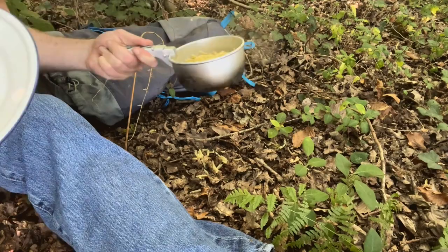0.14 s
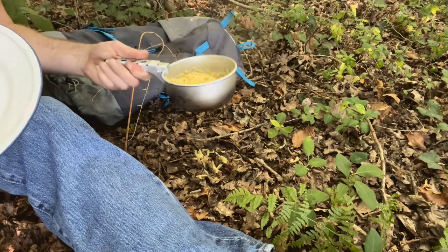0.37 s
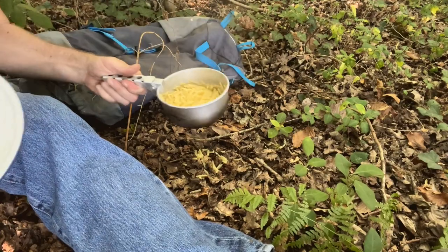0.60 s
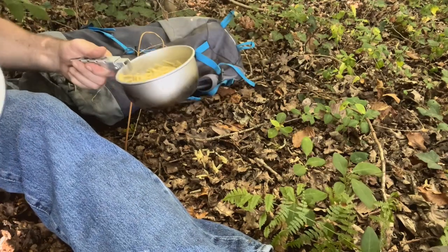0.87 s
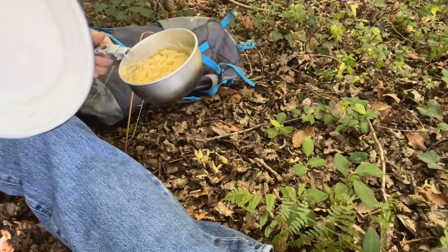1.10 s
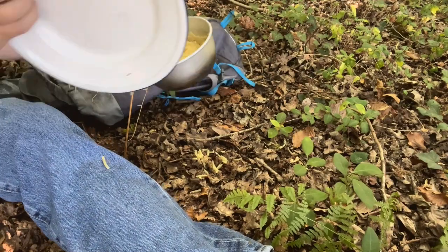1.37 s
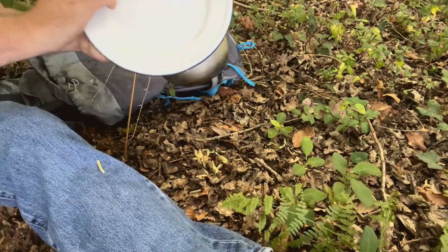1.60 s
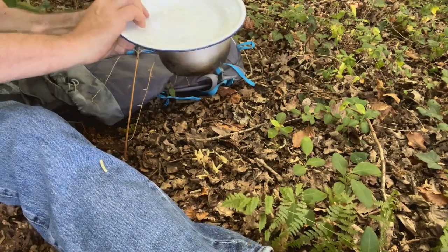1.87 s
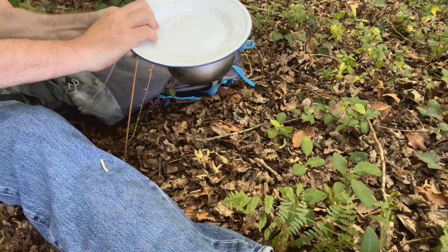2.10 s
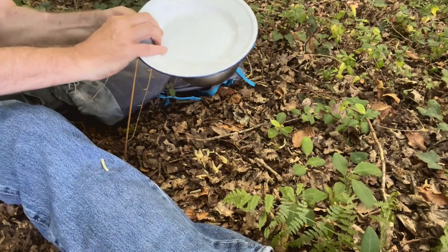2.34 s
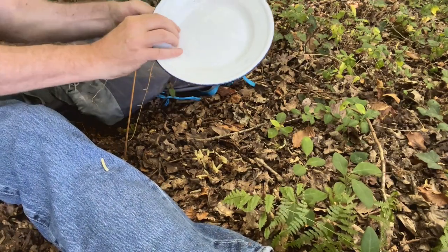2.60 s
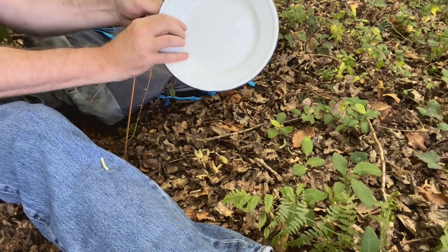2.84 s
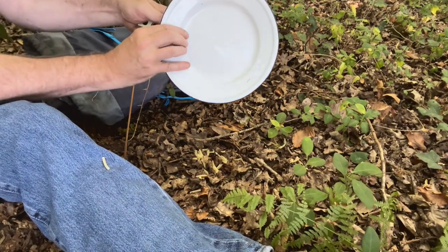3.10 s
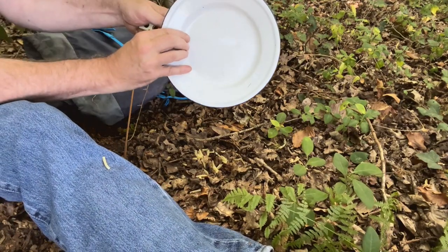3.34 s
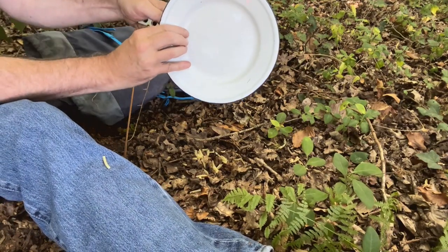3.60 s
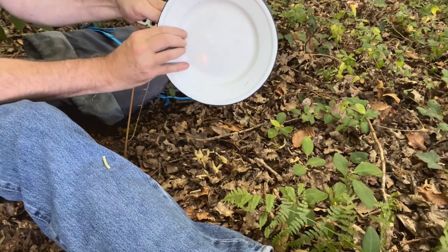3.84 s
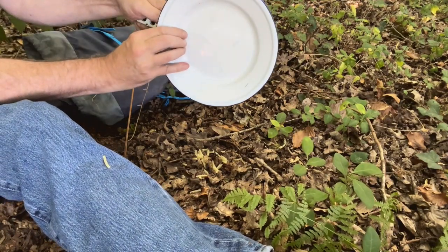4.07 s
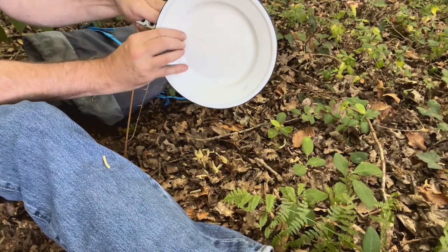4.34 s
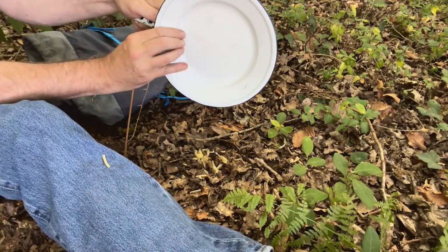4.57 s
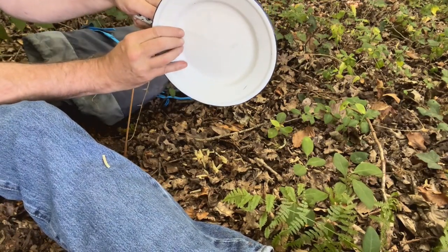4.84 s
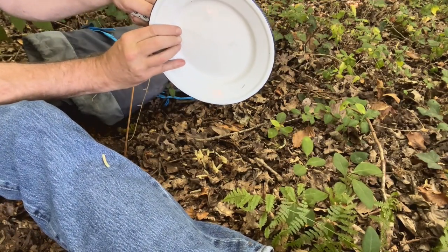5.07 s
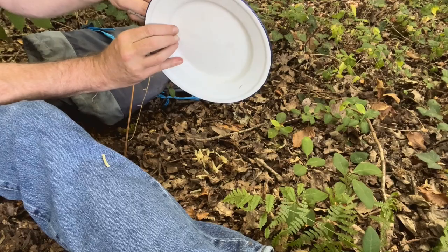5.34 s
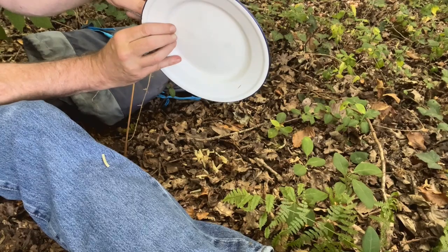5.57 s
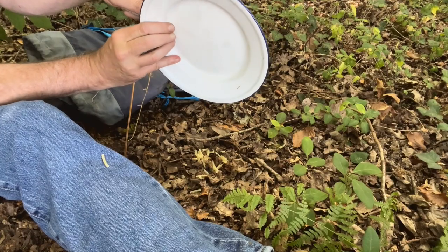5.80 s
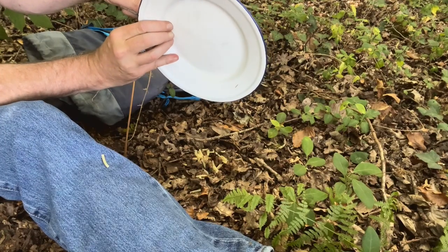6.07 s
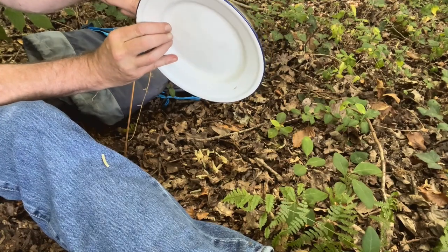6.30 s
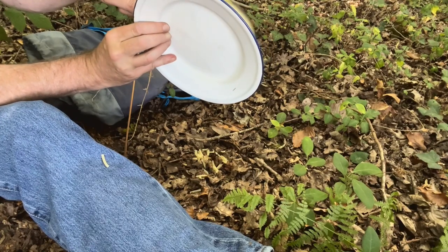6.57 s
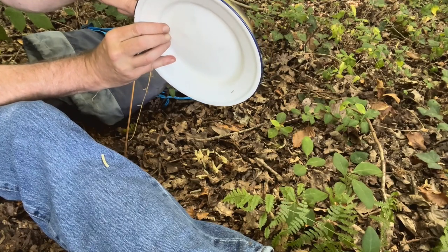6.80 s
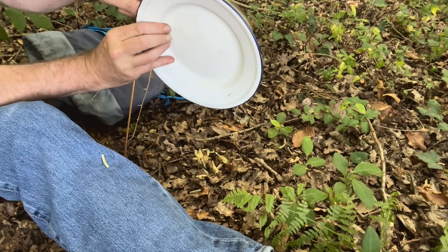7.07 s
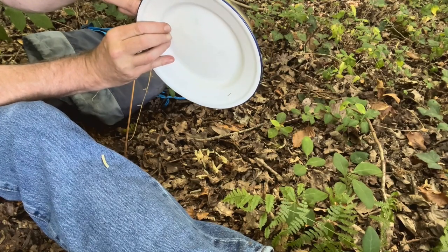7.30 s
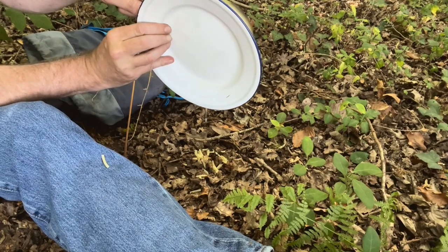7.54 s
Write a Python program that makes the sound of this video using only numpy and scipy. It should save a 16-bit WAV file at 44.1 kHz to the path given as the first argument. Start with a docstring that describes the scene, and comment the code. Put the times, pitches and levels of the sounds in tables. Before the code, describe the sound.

Close stereo microphone in a wood. Dry leaves and cloth rustle and tick, and a pot handle jingles faintly. An enamel plate then lands on a small metal pot with a loud hollow bonk and bright short ring, followed by a quick clatter. Later come a softer scrape and knock, pattering leaf ticks, and a final sharp, damped clank. Distant road noise underlies everything.

```python
"""A wood: far road noise with an engine hum fills it, as coloured noise and a wavering sine.
Dry leaves and cloth tick and rustle nearby: noise bursts and clumps of small resonant snaps.
A small pot's folding handle jingles once: thin modes driven by noise.
An enamel plate is laid on the metal pot, scrapes, slides and knocks against its rim;
the air shut in the pot thuds, the plate rings in modes set by the place struck."""
import sys
import numpy as np
from scipy import signal
from scipy.fft import rfft, irfft
from scipy.io import wavfile

SR = 44100
rng = np.random.default_rng(int(sys.argv[2]) if len(sys.argv) > 2 else 0)


def decibels_to_gain(level_db):
    """Convert a level in decibels to a linear amplitude gain (20 dB per decade)."""
    exponent = np.asarray(level_db, float) / 20
    return 10 ** exponent


def to_wav(s):
    """Save 16-bit WAV."""
    ch = np.atleast_2d(s).T  # columns
    pcm = np.round(np.clip(ch, -1, 1) * 32767)  # PCM
    wavfile.write(sys.argv[1], SR, pcm.astype(np.int16))


N = 338407

# plate modes: (frequency [Hz], waves around the rim, phase of that pattern [degrees])
PLATE_MODES = [(875, 13, 110), (1030, 11, 115), (1262, 4, 60), (1281, 5, 130), (1430, 2, 150),
               (1793, 9, 100), (1903, 8, 30), (2095, 4, 50), (2260, 9, 120), (2312, 2, 150),
               (2410, 12, 150), (2686, 15, 85), (2778, 8, 10), (2880, 13, 85), (3035, 4, 155),
               (3300, 11, 70), (3510, 11, 25), (3540, 10, 15), (3740, 2, 130), (4075, 2, 130),
               (4275, 12, 90), (4390, 3, 135), (4625, 10, 35), (5110, 3, 145), (5420, 12, 15),
               (5864, 15, 85), (6080, 9, 170), (4511, 14, 75), (6370, 12, 175), (7784, 12, 135)]
# sound of each of those modes: (level [dB], t60 [s])
PLATE_MODE_RING = [(-2.5, 0.26), (-6.0, 0.15), (-5.0, 0.35), (-2.5, 0.3), (3.0, 0.37), (-1.0, 0.3),
                   (6.5, 0.15), (-4.0, 0.17), (-0.5, 0.26), (-4.5, 0.3), (2.0, 0.14), (-6.5, 0.377),
                   (-5.5, 0.37), (2.0, 0.08), (1.5, 0.1), (-3.5, 0.16), (-4.5, 0.3), (-5.0, 0.3),
                   (-6.5, 0.16), (-4.5, 0.07), (-9.0, 0.3), (-7.5, 0.17), (-10.5, 0.25), (-14.0, 0.3),
                   (-0.5, 0.046), (-6.0, 0.08), (-6.0, 0.1156), (-6.5, 0.07), (-10.0, 0.079), (-13.5, 0.1)]


def rms_one(x):
    """Scale to unit rms."""
    return x / np.sqrt(np.mean(x ** 2) + 1e-20)


def in_time(rows):
    """Interpolate each column after the first over the whole scene."""
    s, *columns = np.transpose(rows)
    return [np.interp(np.arange(N) / SR, s, c) for c in columns]


def at_hz(points, hz):
    """Interpolate (Hz, dB) points on a log frequency axis."""
    point_hz, point_db = np.array(points).T
    return np.interp(np.log(hz + 1), np.log(point_hz), point_db)


def coloured(x, points):
    """Zero-phase colouring of steady noise."""
    n = x.shape[-1]
    gain = decibels_to_gain(at_hz(points, np.fft.rfftfreq(n, 1 / SR)))
    return irfft(rfft(x) * gain, n)


def resonance(x, hz, width_hz):
    """Two-pole resonator with zeros at DC and Nyquist."""
    r = np.exp(-np.pi * width_hz / SR)
    zeros = [(1 - r * r) / 2, 0, (r * r - 1) / 2]
    poles = [1, -2 * r * np.cos(2 * np.pi * hz / SR), r * r]
    return signal.lfilter(zeros, poles, x)


def narrow_band(x, hz, width_hz):
    """Unit-rms noise band from two equal resonators in series."""
    return rms_one(resonance(resonance(x, hz, width_hz), hz, width_hz))


def dying(t, hz, t60):
    """Exponentially decaying sine."""
    return np.sin(2 * np.pi * hz * t) * decibels_to_gain(-60 * t / t60)


def swell(top_s, rise_db_per_s, fall_db_per_s):
    """Gain that climbs to 1 at a moment and sinks after it."""
    t = np.arange(N) / SR - top_s
    return decibels_to_gain(np.where(t < 0, rise_db_per_s * t, -fall_db_per_s * t))


def add(out, s, sound):
    """Mix a sound in at a time in seconds, cut at the end."""
    i = round(s * SR)
    out[..., i:i + sound.shape[-1]] += sound[..., :N - i]


def wide(mid, side):
    """Left and right from a middle and a weaker, unrelated side."""
    # background: (frequency [Hz], side minus mid [dB])
    side_colour = [(35, -45.5), (60, -23.5), (110, -14), (200, -13), (380, -11), (700, -10.5), (1290, -10),
                   (2380, -12), (4400, -14), (8120, -10), (15000, -15.5)]
    return mid + coloured(side, side_colour) * [[1], [-1]]


def road():
    """Tyre roar and rumble swell apart; an engine hum wavers; thin hiss bands lie on top."""
    # spectrum: (frequency [Hz], relative density [dB per Hz])
    road_colour = [(13, -42.5), (22, 10.5), (72, 4), (189, -10.5), (409, -13.5), (1070, -6.5),
                   (1380, -12.5), (3060, -26), (4500, -26.5), (5770, -26), (7190, -29), (8490, -31),
                   (11500, -28), (14700, -32.5), (16000, -38)]
    # (time [s], tyre roar level [dB], rumble level [dB])
    road_levels = [(0, -57.5, -62.5), (2.0, -56, -60), (3.3, -57.5, -59.5), (5.7, -57, -62),
                   (6.3, -57.5, -59.5), (7.1, -57, -59.5), (7.67, -57, -66.5)]
    # engine: (time [s], frequency [Hz], level [dB])
    engine_hum = [(0, 91.3, -90), (2.3, 91.9, -66), (3.2, 92.3, -61), (4.8, 91.2, -62), (5.6, 92.7, -68.5),
                  (7.67, 90, -80.5)]
    # thin steady hiss: (centre [Hz], width of each resonator [Hz], level [dB])
    hiss_bands = [(5600, 240, -81), (11460, 1300, -78), (10000, 1067, -78)]
    roar_db, rumble_db = in_time(road_levels)
    noise = wide(*coloured(rng.standard_normal((2, N)), road_colour))
    rumble = signal.sosfiltfilt(signal.butter(2, 130, fs=SR, output="sos"), noise)
    roar = noise - rumble

    hum_hz, hum_db = in_time(engine_hum)
    waver = 1 + 0.12 * rms_one(resonance(rng.standard_normal(N), 1.1, 2.1))
    hum = decibels_to_gain(hum_db) * np.sqrt(2) * waver * np.sin(2 * np.pi * np.cumsum(hum_hz) / SR)

    hiss = wide(*rng.standard_normal((2, N)))
    whine = sum(decibels_to_gain(db) * narrow_band(hiss, hz, width_hz) for hz, width_hz, db in hiss_bands)
    return decibels_to_gain(roar_db) * rms_one(roar) + decibels_to_gain(rumble_db) * rms_one(rumble) + hum + whine


def rustle():
    """Clumps of small snaps, each with its own short resonance, over friction noise; brightness tilts the mix."""
    # steady stirring of leaves and cloth: (time [s], level [dB], brightness [dB])
    stirring = [(0, -69.5, -11), (.4, -95, -26), (.65, -62, -1), (.98, -69, -7), (1.1, -59, -4),
                (1.45, -56, -1.5), (1.7, -91, -8.5), (1.76, -63, 0), (2.3, -83.5, -21), (2.8, -63.5, 3.5),
                (3.3, -69.5, -4), (4.3, -81, -3), (4.45, -69.5, -7.5), (5.1, -71.5, 2), (5.68, -68.5, -2),
                (5.78, -79, 2.5), (6.4, -87, 8), (6.6, -95, 0.5)]
    # single swishes: (loudest time [s], level [dB], brightness [dB], length [s])
    swishes = [(0.1, -51.5, 2.5, 0.075), (0.192, -52, 2, 0.074), (0.344, -55.5, -1, 0.087),
               (0.845, -53.5, 0.5, 0.12), (1.525, -47, 0, 0.14), (1.67, -51, -0.5, 0.076),
               (2.903, -59, 1, 0.18), (3.411, -54.5, 0, 0.07), (4.033, -63, 2, 0.14), (4.46, -66, 10, 0.21),
               (5.575, -69, 5, 0.12), (6.432, -67, 3, 0.073)]
    # spectrum: (frequency [Hz], relative density [dB per Hz])
    rustle_colour = [(880, -28.5), (1500, -6.5), (1790, -7), (3150, -9.5), (3450, -7), (11100, -10.5),
                     (14800, -15), (16000, -37.5)]
    grains_per_s, spread_db, smooth_gain, clump_db = 890, 6, 2.86, 5   # grain rate is also scaled by the clumps
    rise_share, range_db = 0.5, 9   # share of a swish spent rising; fall from top to either end

    level_db, tilt_db = in_time(stirring)
    low_power, high_power = decibels_to_gain(level_db - tilt_db) ** 2, decibels_to_gain(level_db + tilt_db) ** 2
    for s, db, bright_db, length_s in swishes:
        rise_db_per_s = range_db / (rise_share * length_s)
        fall_db_per_s = range_db / ((1 - rise_share) * length_s)
        power = swell(s, rise_db_per_s, fall_db_per_s) ** 2
        low_power = low_power + power * decibels_to_gain(db - bright_db) ** 2
        high_power = high_power + power * decibels_to_gain(db + bright_db) ** 2

    clumps = decibels_to_gain(clump_db * rms_one(resonance(rng.standard_normal(N), 15.0, 36)))
    born = rng.random((2, N)) < clumps * grains_per_s / SR
    sizes = born * decibels_to_gain(spread_db * np.minimum(rng.exponential(1, (2, N)), 4))
    sizes = sizes * rng.choice([-1, 1], (2, N))
    dealt = rng.integers(0, 8, (2, N))   # which of eight resonances a grain excites
    snaps = sum(rms_one(resonance(sizes * (dealt == k) + 1e-18, hz, 0.3 * hz)) * np.sqrt(hz)
                for k, hz in enumerate(np.geomspace(2500, 13000, 8)))
    friction = smooth_gain * np.sqrt(clumps) * rng.standard_normal((2, N))
    mid, side = coloured(rms_one(snaps) + friction, rustle_colour)
    both = rms_one(wide(mid, side))
    low = signal.sosfiltfilt(signal.butter(1, 6000, fs=SR, output="sos"), both)
    return np.sqrt(low_power) * low + np.sqrt(high_power) * (both - low)


def faint_ticks():
    """Rows like those of the loud ticks, at chance times, levels and pitches."""
    # spells; the dense one is water draining on dry leaves: (start [s], end [s], rate [ticks per s])
    spells = [(0, 1.7, 18), (2.2, 4.35, 6), (4.37, 5.7, 45), (5.7, 6.5, 4)]
    mean_db, spread_db, t60_s, low_hz, high_hz = -45.5, 4, 0.0064, 3910, 13300
    rows = []
    for start, end, rate in spells:
        for a, b, c in rng.random((int(rate * (end - start)), 3)):
            s = start + (end - start) * a
            db = mean_db + spread_db * (2 * b - 1)
            rows.append((s, db, low_hz * (high_hz / low_hz) ** c, t60_s))
    return rows


def ticks():
    """Each snap is an impulse and a noise burst with a broad resonance of its own; low bursts are made alike."""
    # loud leaf and cloth ticks: (time [s], peak of the middle before panning [dB], centre [Hz], t60 [s])
    loud_ticks = [(0.0452, -42, 3840, 0.004), (0.1503, -25, 9300, 0.0095), (0.192, -34.5, 8700, 0.0075),
                  (0.294, -27, 4860, 0.043), (0.373, -42.5, 3650, 0.0078), (0.4814, -40, 2750, 0.013),
                  (0.4897, -42, 2650, 0.014), (0.5459, -32, 5600, 0.028), (0.5527, -35.5, 5600, 0.012),
                  (0.6106, -41, 3280, 0.0079), (0.8189, -44, 4300, 0.012), (0.9571, -42, 7400, 0.011),
                  (1.1455, -43.5, 2830, 0.018), (1.5267, -29.5, 7000, 0.018), (1.689, -39.5, 5400, 0.01),
                  (1.895, -39.5, 7000, 0.0073), (2.078, -38, 12400, 0.036), (2.237, -36, 9550, 0.0048),
                  (2.6314, -39, 5800, 0.0097), (2.6643, -31, 5900, 0.011), (2.834, -35.5, 4320, 0.0041),
                  (2.9037, -31, 10000, 0.0061), (2.919, -37, 5970, 0.0067), (3.4102, -41, 4660, 0.011),
                  (3.7716, -33.5, 5330, 0.008), (3.778, -37.5, 10000, 0.015), (4.368, -21.5, 9900, 0.0057),
                  (4.6039, -38.5, 7200, 0.0081), (4.897, -36.5, 5160, 0.0081), (4.971, -34.5, 10900, 0.01),
                  (5.1017, -38.5, 10100, 0.017), (5.2646, -36, 9750, 0.019), (5.3343, -41, 8200, 0.0082),
                  (5.5239, -37.5, 4660, 0.014), (5.655, -22, 11160, 0.0088), (5.8933, -39, 10000, 0.0083),
                  (6.314, -36, 10100, 0.015), (6.4112, -40, 9700, 0.0083), (6.956, -35.5, 5260, 0.0095)]
    # low bursts: dull thumps, and the low body of some ticks and of the knock at 6.85 s:
    # (time [s], peak [dB], centre [Hz], t60 [s])
    low_bursts = [(1.253, -41, 600, .03), (1.256, -44, 1200, .02), (3.79, -45, 170, .1),
                  (5.295, -51, 200, .06), (6.8535, -19.5, 460, .014), (.2938, -37, 1000, .02),
                  (.5535, -42, 1000, .012)]
    snap = 3.87   # first impulse of a tick against the noise that follows
    width_share, broad_db, side_db = 0.14, -0.5, -18.5
    mean_pan_db, pan_spread_db = 2, 6.5   # left minus right
    out, t = np.zeros((2, N)), np.arange(SR // 8) / SR
    for s, db, hz, t60 in loud_ticks + faint_ticks():
        burst = rng.standard_normal((2, len(t))) * decibels_to_gain(-60 * t / max(t60, .002))
        burst[:, 0] = snap
        band = signal.butter(2, [0.13 * hz, min(3.0 * hz, .4 * SR)], "band", fs=SR, output="sos")
        narrow = rms_one(resonance(burst, hz, width_share * hz))
        broad = rms_one(signal.sosfilt(band, resonance(burst, hz, 1.7 * hz)))
        mid, side = narrow + decibels_to_gain(broad_db) * broad
        pan_db = rng.normal(mean_pan_db, pan_spread_db) * np.array([[.5], [-.5]])
        stereo = mid + decibels_to_gain(side_db) * side * [[1], [-1]]
        add(out, s, decibels_to_gain(db + pan_db) * stereo / np.abs(mid).max())
    for s, db, hz, t60 in low_bursts:
        push = rng.standard_normal(len(t)) * decibels_to_gain(-60 * t / t60)
        push[0] = 2 * snap
        band = signal.butter(3, [.65 * hz, 1.8 * hz], "band", fs=SR, output="sos")
        low = signal.sosfilt(band, resonance(push, hz, .9 * hz))
        add(out, s, decibels_to_gain(db) * low / np.abs(low).max())
    return out


def jingle():
    """The loose handle rattles in its hinge: thin modes, roughened, over a hiss of tiny taps."""
    # rattles: (time [s], peak of the ringing modes [dB])
    rattles = [(0.508, -33.5), (0.5216, -37)]
    # handle modes: (frequency [Hz], relative level [dB], t60 [s])
    handle_modes = [(2082, 2, 0.075), (5300, -3, 0.04), (5800, -1.5, 0.05), (6160, 2, 0.19),
                    (7080, 4, 0.045), (7900, 4, 0.18), (8400, -1.5, 0.05), (9250, -1.5, 0.05),
                    (10650, -3, 0.06), (11600, -6, 0.04)]
    hiss_db, hiss_t60_s, taps_t60_s = -5, .09, .045
    out, t = np.zeros(N), np.arange(SR // 3) / SR
    for s, db in rattles:
        taps = rng.standard_normal(len(t)) * decibels_to_gain(-60 * t / taps_t60_s)
        ring = sum(decibels_to_gain(mode_db) * rms_one(resonance(taps, hz, 2.2 / t60))
                   for hz, mode_db, t60 in handle_modes)
        hiss = resonance(rng.standard_normal(len(t)), 4300, 4200) * decibels_to_gain(hiss_db - 60 * t / hiss_t60_s)
        add(out, s, decibels_to_gain(db) * (ring / np.abs(ring).max() + hiss))
    return out


def scrape():
    """Friction noise in a few narrow bands: a faint scrape while the plate is brought over."""
    # (time [s], level [dB])
    scrape_levels = [(.98, -87), (1.06, -63.5), (1.3, -64), (1.52, -67), (1.6, -90)]
    # (centre [Hz], width of each resonator [Hz], relative level [dB])
    scrape_bands = [(1540, 162, 2.5), (2733, 240, -0.5), (3180, 220, -3.5)]
    noise = rng.standard_normal(N)
    bands = sum(decibels_to_gain(db) * narrow_band(noise, hz, width_hz) for hz, width_hz, db in scrape_bands)
    return decibels_to_gain(in_time(scrape_levels)[0]) * bands


def slides():
    """Small uneven catches of enamel on the rim drive air and hand-damped plate; each slide swells, then stops."""
    # plate sliding on the rim: (start [s], loudest time [s], shut-in air level [dB], plate level [dB])
    slide_rows = [(2.51, 2.582, -63, -55), (2.619, 2.659, -43, -52), (2.945, 3.007, -47, -50.5),
                  (6.795, 6.862, -42, -48), (6.875, 6.984, -56.5, -59.5), (7.626, 7.679, -51, -54.5)]
    catches_per_s, rise_db, fall_db_per_s = 1500, 20, 504
    air_hz, air_width_hz, plate_width_hz = 620, 75, 44
    shapes = np.array([swell(top_s, rise_db / max(top_s - s, .01), fall_db_per_s) * (np.arange(N) > s * SR)
                       for s, top_s, *levels in slide_rows])
    air_db, plate_db = np.transpose(slide_rows)[2:]
    catches = (rng.random(N) < catches_per_s / SR) * rng.standard_normal(N)
    air = rms_one(resonance(catches, air_hz, air_width_hz))
    plate = rms_one(sum(decibels_to_gain(db / 2) * resonance(resonance(catches, hz, 400), hz, plate_width_hz)
                        for (hz, waves, phase), (db, t60) in zip(PLATE_MODES, PLATE_MODE_RING)))
    return decibels_to_gain(air_db) @ shapes * air + decibels_to_gain(plate_db) @ shapes * plate


def pot_thud(t, thud_db, air_hz, body_db, t60):
    """Air, beating pot body, walls and rim, each dying in its share of the air's t60, the dull walls soonest."""
    # dull wall modes: (frequency [Hz], level against the air [dB], share of the thud's t60)
    wall_modes = [(194.8, -20, 0.39), (416, -9.5, 0.21)]
    rim_db = 2.5 + .75 * thud_db   # stronger blows stir the rim more
    thud = dying(t, air_hz, t60) - decibels_to_gain(body_db) * dying(t, 592, 0.72 * t60)
    thud += sum(decibels_to_gain(db) * dying(t, hz, share * t60) for hz, db, share in wall_modes)
    thud -= decibels_to_gain(rim_db) * dying(t, 2420, .92 * t60)
    return thud * (1 - np.exp(-t / 0.0013))   # the contact lasts a cycle or two


def plate_strength(place):
    """Mode amplitudes by place on the rim [degrees]; a blow near a node hardly stirs that mode."""
    hz, waves, phase = np.transpose(PLATE_MODES)[:, :, None]
    level_db = np.transpose(PLATE_MODE_RING)[0][:, None]
    shape = np.cos(np.radians(waves * place - phase))
    return decibels_to_gain(level_db) * np.sign(shape) * np.hypot(.08, shape)


def plate_ring(t, strength, grip_db_per_s):
    """Decaying plate modes; the hand damps high modes more."""
    hz = np.transpose(PLATE_MODES)[0][:, None]
    t60 = np.transpose(PLATE_MODE_RING)[1][:, None]
    hand = decibels_to_gain(-max(grip_db_per_s, 0) * (hz / 2000) ** .7 * t)
    return (strength * dying(t, hz, t60) * hand).sum(axis=0)


def rim_crack(t, strength):
    """Short coloured noise burst, and the plate modes it shakes as a dying clatter."""
    # spectrum: (frequency [Hz], relative density [dB per Hz])
    crack_colour = [(150, -57.5), (700, -6), (1300, -11), (3000, -10.5), (6000, -17.5), (8000, -27.5),
                    (11500, -20.5), (16000, -29.5)]
    crack_db, crack_t60_s, clatter_db, clatter_t60_s, clatter_width_hz = -8, 0.036, -20.5, 0.048, 15
    noise = rms_one(coloured(rng.standard_normal(len(t)), crack_colour))
    gains = np.sqrt(np.abs(strength[:, 0]))
    chatter = rms_one(sum(gain * resonance(noise, hz, clatter_width_hz)
                          for (hz, waves, phase), gain in zip(PLATE_MODES, gains)))
    crack = noise * decibels_to_gain(crack_db - 60 * t / crack_t60_s)
    return crack + chatter * decibels_to_gain(clatter_db - 60 * t / clatter_t60_s)


def knocks():
    """Plate on rim: pot thud, plate modes weighted by where the rim is met, a click, a crack and a dying clatter."""
    # (time [s], thud level [dB], shut-in air [Hz], pot body against air [dB], ring level [dB],
    #  place on the plate's rim [degrees])
    knock_rows = [(1.787, -6, 712, -11, -30.5, 13), (1.9563, -17, 684, 1, -33.5, 39.5),
                  (1.9711, -11, 730, -2, -40, 39.5), (1.9765, -26, 700, 0, -27.5, 22.5),
                  (1.9855, -20.5, 725, 7.5, -42, 22.5), (2.1147, -27.5, 737, 2.5, -48, 107),
                  (2.1622, -31.5, 688, 0, -48.5, 104), (2.9972, -18.5, 703, 1.5, -35.5, 81.5),
                  (5.404, -36, 725, -23, -48, 111.5), (6.8535, -15.5, 730, -5, -25.5, 42),
                  (6.8563, -23, 715, 7, -44, 42), (2.029, -39, 710, 11, -55, 22.5),
                  (2.533, -46.5, 706, -3, -62, 22.5), (2.615, -39.5, 695, 2, -63, 104),
                  (2.651, -44, 700, 7, -56, 13), (2.657, -42, 680, 4, -65, 107),
                  (2.685, -46, 670, 9, -70, 104), (3.7712, -33, 900, -18, -56, 107),
                  (5.2944, -38, 710, -10, -50, 81.5)]
    # the hand closes on plate and pot: (time [s], plate damping at 2 kHz [dB per s], below 0 = none,
    #  thud t60 [s])
    hand_grip = [(1.79, -10, 0.083), (1.96, 71, 0.051), (1.99, 67, 0.034), (2.16, 184.5, 0.049),
                 (3.0, 214, 0.034), (3.77, 649, 0.011), (5.3, 297.5, 0.027), (6.85, 596, 0.032)]
    touch_rise_s, click_hz, click_t60_s = 0.00013, 2240, 0.0018
    bright_hz, bright_growth = 26800, 0.6   # stronger blows are brighter
    out, t = np.zeros(N), np.arange(SR // 2) / SR
    short = t[:SR // 8]
    touch = 1 - np.exp(-t / touch_rise_s)   # ring and crack build up while the contact lasts
    grips, thud_t60s = in_time(hand_grip)
    for s, thud_db, air_hz, body_db, ring_db, place in knock_rows:
        i = int(s * SR)
        strength = plate_strength(place)
        thud = pot_thud(t, thud_db, air_hz, body_db, thud_t60s[i])
        ring = plate_ring(t, strength, grips[i])
        add(out, s, decibels_to_gain(thud_db) * thud + decibels_to_gain(ring_db) * ring * touch)

        hard_db = 6 + 0.2 * (ring_db - thud_db)   # a knock that rings more also cracks more
        click_db = -5 - 0.25 * thud_db   # first touch of metal on enamel, less marked in strong blows
        click = decibels_to_gain(click_db) * dying(short, click_hz, click_t60_s)
        crack = rim_crack(short, strength) * touch[:len(short)]
        soft_hz = min(bright_hz * decibels_to_gain(bright_growth * thud_db), .45 * SR)
        soft = signal.butter(3, soft_hz, fs=SR, output="sos")
        add(out, s, decibels_to_gain(thud_db + hard_db) * signal.sosfilt(soft, click + crack))
    return out


def scene():
    """Metal sounds with echoes, over ticks, rustle and road."""
    # ground and body: (delay [s], level [dB])
    echo_rows = [(.004, -22.5), (.011, -34), (.023, -27.5)]
    metal = knocks() + slides() + scrape() + jingle()
    # a small pot radiates no bass
    metal = signal.sosfilt(signal.butter(1, 120, "high", fs=SR, output="sos"), metal)
    out = metal * decibels_to_gain([[.1], [-.1]]) + ticks() + rustle() + road()
    # the treble of the metal reaches the two ports a little unalike
    bright = signal.sosfilt(signal.butter(2, 1200, "high", fs=SR, output="sos"), metal)
    add(out, .0006, decibels_to_gain(-23.5) * bright * [[1], [-1]])
    dull = signal.lfilter([.5], [1, -.5], metal)
    for k, (lag_s, db) in enumerate(echo_rows):
        odd = k % 2   # every second echo is more even between the sides
        add(out, lag_s, decibels_to_gain(db) * dull * [[1 - 0.55 * odd], [0.5 + 0.091 * odd]])
    return out


def roll_off(x):
    """The treble ends steeply here."""
    return signal.sosfilt(signal.butter(12, 16790, fs=SR, output="sos"), x)


def record(dry):
    """The microphone drops the deepest bass."""
    mix = signal.sosfilt(signal.butter(6, 41, "high", fs=SR, output="sos"), dry)
    return roll_off(mix)


dry = scene()
out = record(dry)
to_wav(out)
```